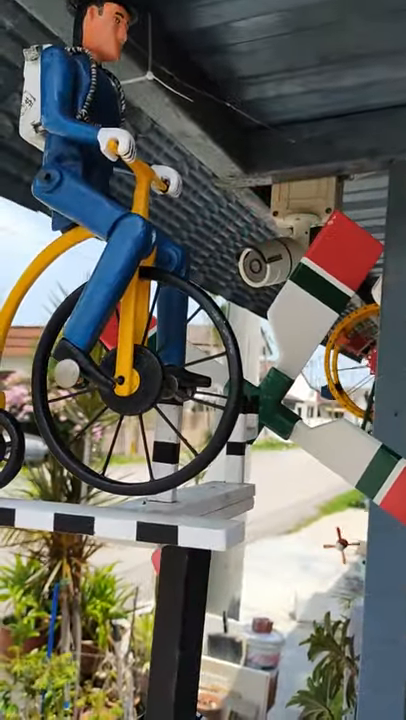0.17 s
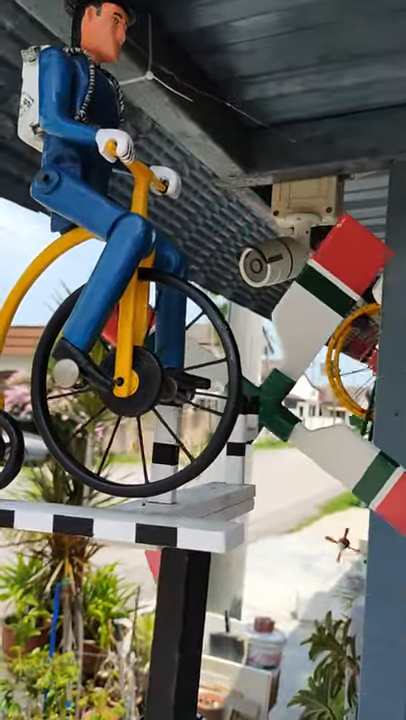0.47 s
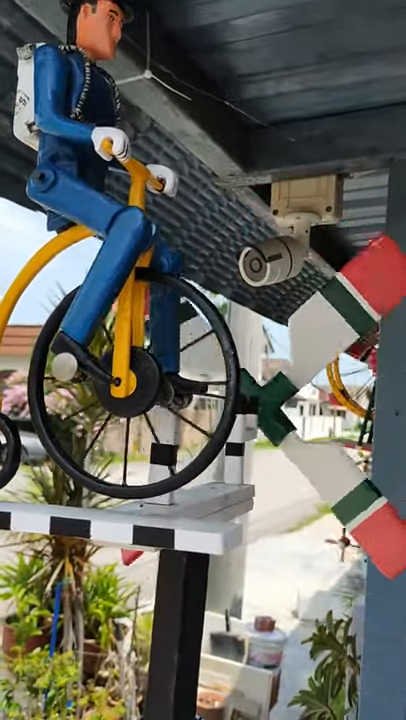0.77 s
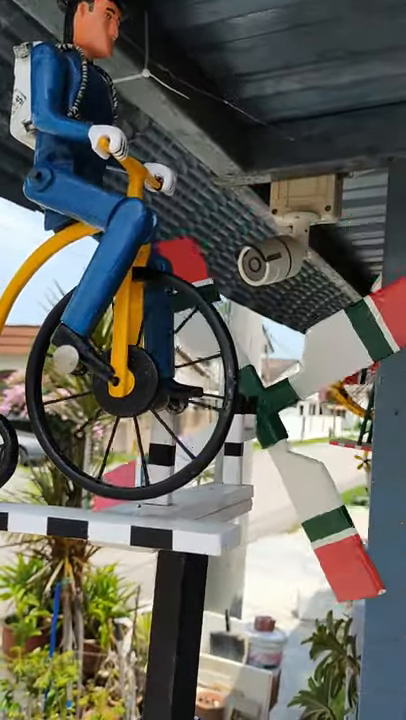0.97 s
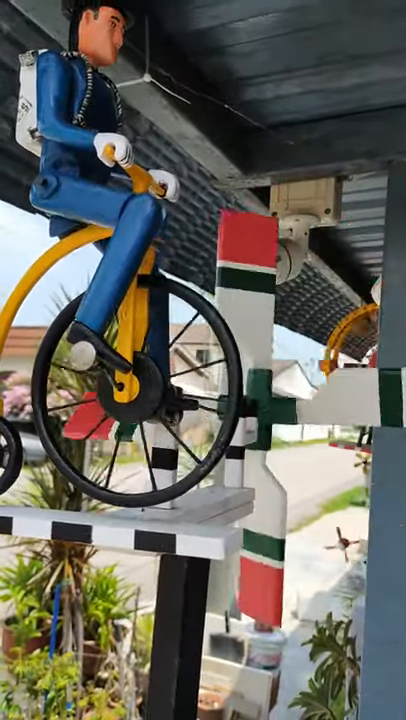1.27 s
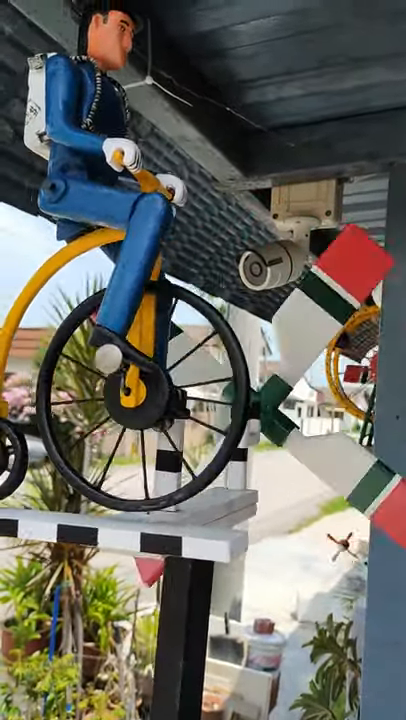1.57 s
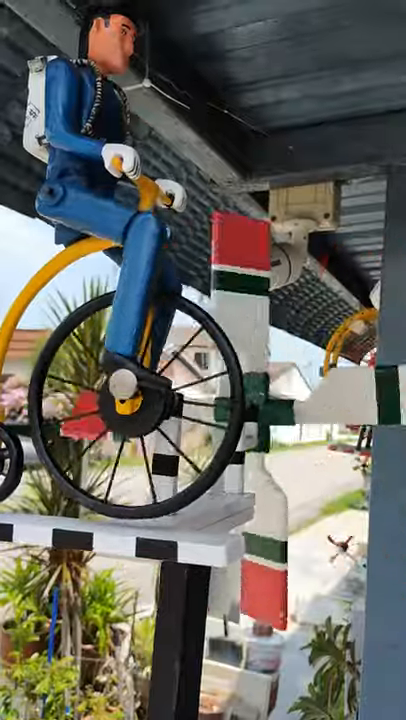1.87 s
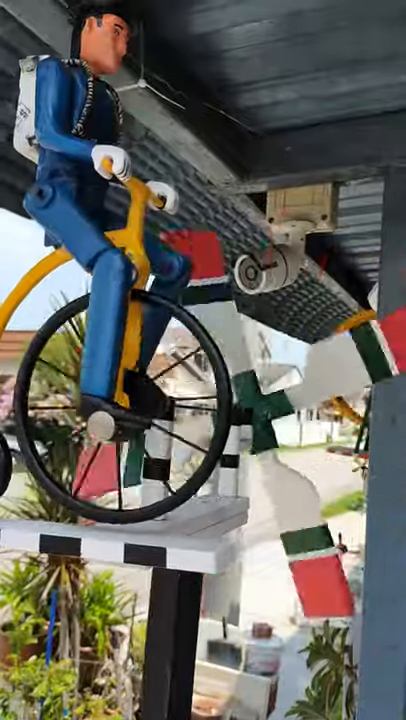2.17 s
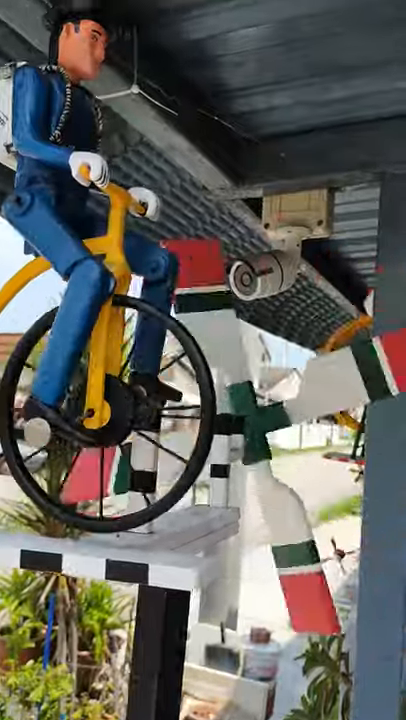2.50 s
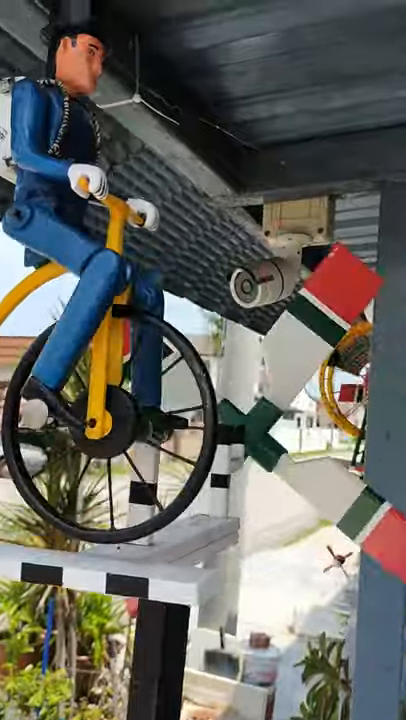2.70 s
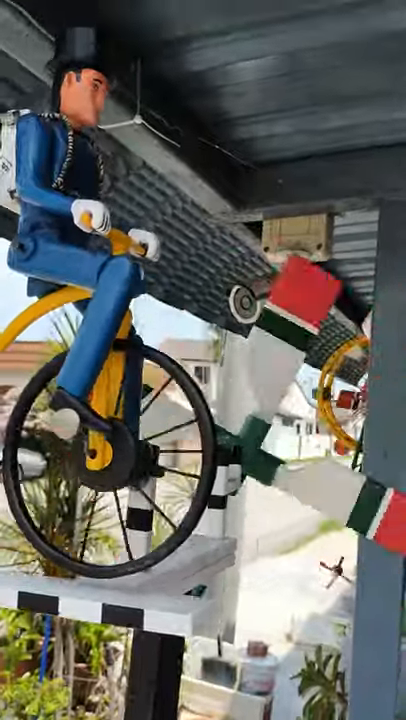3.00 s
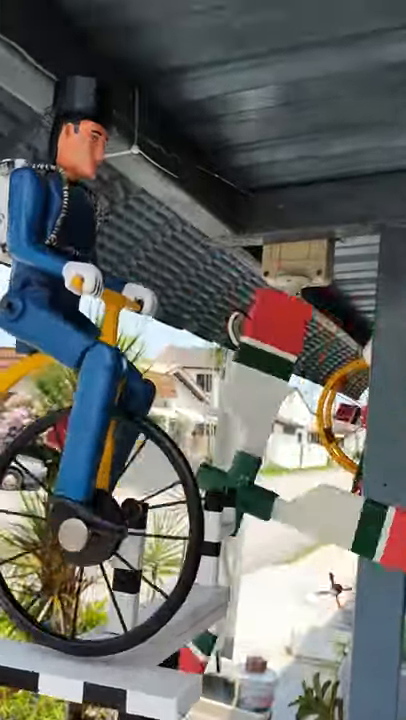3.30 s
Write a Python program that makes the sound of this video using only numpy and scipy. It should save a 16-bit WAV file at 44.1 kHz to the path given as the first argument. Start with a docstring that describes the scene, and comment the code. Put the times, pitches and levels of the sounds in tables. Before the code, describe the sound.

A loose wooden whirligig linkage clatters from start to end, two short chattering bursts per turn, at about 0.06, 0.4, 0.6, 0.9 and 1.1 s, then alternating gaps of 0.2 and 0.3 s until 3.36. Light ticks, grating and scuffs fill between; small knocks near 1.7 and 2.5-2.6. Soft outdoor hiss, short porch reflections. Low wind thumps the close microphone, strongest around 2.0-2.4, easing after 2.9.

```python
"""A soft outdoor hiss opens the scene, with wind buffeting and rumbling on the microphone.
Wooden whirligigs turn in the breeze under a porch roof: a loose linkage rattles twice in each turn,
out and back, with light ticks and grating between, stray scuffs and an odd knock.
Hiss and wind are shaped noise with pulses for eddies; every wooden contact is a brief puff of noise
with an envelope and colour of its own, and rattle and knocks also ring in the porch."""
import sys
import numpy as np
from scipy import signal
from scipy.fft import rfft, irfft
from scipy.io import wavfile
from scipy.ndimage import uniform_filter1d

SR = 44100
rng = np.random.default_rng(int(sys.argv[2]) if len(sys.argv) > 2 else 0)


def store_wav(level_fs):
    """Save 16-bit WAV to argv[1]."""
    pcm = np.round(np.clip(np.atleast_2d(level_fs), -1, 1) * 32767)
    wavfile.write(sys.argv[1], SR, pcm.T.astype(np.int16))


N = 152145
CONTACT_ATTACK_S = 0.0004   # time constant of every wooden onset


def from_db(db):
    """Decibels to gain."""
    return 10 ** (np.asarray(db) / 20)


def rms_one(x):
    """Scale to unit rms."""
    return x / np.sqrt(np.mean(x ** 2) + 1e-20)


def in_time(rows):
    """A control curve at every sample."""
    return np.interp(np.arange(N) / SR, *np.transpose(rows))


def add(out, s, sound):
    """Mix a sound in at a time in seconds."""
    i = max(int(s * SR), 0)
    out[i:i + len(sound)] += sound[:N - i]


def through(x, response):
    """Convolve with an impulse response."""
    return signal.fftconvolve(x, response)[:N]


def colour(x, points, size=8192):
    """Minimum-phase filter of unit energy that follows a spectrum, by folding its cepstrum."""
    hz, db = np.transpose(points)
    grid_hz = np.linspace(1, SR / 2, size // 2 + 1)
    gain = from_db(np.interp(np.log(grid_hz), np.log(hz), db))
    cepstrum = irfft(np.log(gain))
    cepstrum[1:size // 2] *= 2
    cepstrum[size // 2 + 1:] = 0
    response = irfft(np.exp(rfft(cepstrum)))
    return through(x, response / np.linalg.norm(response))


def band_noise(low_hz, high_hz):
    """Noise between two edges, rms 1, with a second of filter run-in dropped."""
    sos = signal.butter(3, [low_hz, high_hz], "band", fs=SR, output="sos")
    return rms_one(signal.sosfilt(sos, rng.standard_normal(N + SR))[SR:])


def evened(x, span_s):
    """Take the slow swings out of a noise."""
    return x / np.sqrt(uniform_filter1d(x ** 2, int(span_s * SR) + 1) + 1e-6)


def outdoors():
    """Steady distant hiss of coloured noise, with a very narrow band of noise as a faint thin whine."""
    # spectrum of the hiss: (frequency [Hz], level [dB])
    air = [(40, 8), (80, 12.5), (150, -10), (300, -1), (600, -3), (1100, -2), (1600, -0.5), (2200, 1.5),
           (3200, -6), (5500, -14.5), (8000, -8.5), (9400, -14.5), (12000, -12.5), (15000, -8), (16000, -9)]
    air_db, whine_db, whine_hz = -53.5, -75, 4005
    hiss = from_db(air_db) * colour(rng.standard_normal(N), air)
    whine = from_db(whine_db) * band_noise(whine_hz - 5, whine_hz + 5)
    return hiss + whine


def wind():
    """Turbulence on the microphone: stronger gusts reach higher in pitch, and single eddies slap."""
    # strength of the buffeting: (time [s], level [dB])
    gust = [(0.0, -49), (0.11, -64), (0.25, -39.5), (0.32, -59), (0.37, -43), (0.48, -37.5), (0.67, -49),
            (0.77, -32), (0.81, -43.5), (0.85, -30.5), (0.89, -42), (1.1, -31.5), (1.145, -64), (1.2, -39),
            (1.38, -36.5), (1.41, -24.5), (1.47, -34.5), (1.58, -36.5), (1.61, -26.5), (1.82, -43),
            (1.87, -29.5), (1.94, -47), (1.98, -27), (2.04, -15), (2.09, -18.5), (2.12, -41), (2.16, -20.5),
            (2.25, -37.5), (2.28, -26), (2.38, -32), (2.41, -25), (2.49, -46.5), (2.54, -34.5),
            (2.6, -27.5), (2.62, -51), (2.67, -31.5), (2.73, -59), (2.82, -32), (2.9, -45.5), (3.05, -52.5),
            (3.19, -41.5), (3.22, -56.5), (3.45, -69)]
    # strength of the deep rumble: (time [s], level [dB])
    rumble_curve = [(0.0, -44), (0.14, -49.5), (0.26, -31.5), (0.32, -50), (0.4, -32), (1.1, -33.5),
                    (1.15, -45), (1.2, -35.5), (1.45, -35.5), (1.63, -27.5), (1.83, -37), (2.09, -25),
                    (2.1, -29.5), (3.08, -42), (3.14, -31), (3.29, -48.5), (3.45, -44)]
    # spectrum of the rumble: (frequency [Hz], level [dB])
    rumble_colour = [(10, -44), (20, 3), (35, 8.5), (55, 4), (76, -2.5), (100, -16.5), (400, -100)]
    # buffeting by band: (centre [Hz], level in a reference gust [dB], growth [dB per dB of gust])
    wind_bands = [(76.6, -32, 0.81), (112.5, -34.5, 0.76), (157.3, -34.5, 1), (235, -38, 1.24),
                  (328.5, -45.5, 1.7), (441, -54, 2.01), (727, -63, 1.37), (1010, -79, 1.77)]
    # eddies that slap the microphone: (time [s], level [dB], half width [s])
    eddies = [(0.196, -30.5, 0.0014), (0.251, -23, 0.0029), (0.539, -23.5, 0.0011), (.843, -19.5, .0012),
              (.857, -15, .0012), (1.01, -23, 0.0014), (1.406, -21.5, 0.002), (1.621, -18, 0.0012),
              (1.665, -19, 0.00098), (1.873, -13, 0.0019), (2.022, -18.5, .0004), (2.088, -21.5, 0.0017),
              (2.158, -17.5, 0.00063), (2.275, -11.5, 0.0009), (2.291, -13.5, 0.00072),
              (2.318, -12, 0.00085), (2.406, -16, 0.00057), (2.453, -20, 0.0049), (2.541, -19, 0.0017),
              (2.67, -25, 0.001), (2.829, -21.5, 0.0011), (3.122, -24, 0.0021), (3.18, -24, 0.0024)]
    reference_gust_db, rumble_db = -28, -1
    gust_cap_db = 10.5   # above the reference gust
    flutter_db, flutter_hz = 3.5, 27.4

    # fast unsteadiness, an octave to each side of its centre
    flutter = flutter_db * evened(band_noise(flutter_hz / 2, flutter_hz * 2), 0.124)
    gust_db = np.minimum(in_time(gust) - reference_gust_db + flutter, gust_cap_db)
    out = np.zeros(N)
    edge = 2 ** (1 / 4)   # half-octave bands
    for hz, db, growth in wind_bands:
        buffet = evened(band_noise(hz / edge, hz * edge), 0.0418)
        out += from_db(db + growth * gust_db) * buffet
    for s, db, width_s in eddies:
        u = np.arange(-SR // 50, SR // 50) / SR / width_s
        slap = (1 - u ** 2) * np.exp(-u ** 2 / 2)   # a push between two pulls
        add(out, s - len(u) / 2 / SR, from_db(db) * slap)
    rumble = evened(colour(rng.standard_normal(N), rumble_colour), 0.146)
    return out + from_db(rumble_db + in_time(rumble_curve) + flutter / 2) * rumble


def dying_noise(t60):
    """A dense decay of unit energy."""
    t = np.arange(SR // 2) / SR
    tail = rng.standard_normal(len(t)) * np.exp(-np.log(1000) * t / t60)
    return tail / np.linalg.norm(tail)


def porch(x):
    """Close reflections from roof and posts, with a longer tail."""
    early_db, early_t60_s, tail_t60_s = -1.5, 0.037, 0.34
    response = from_db(early_db) * dying_noise(early_t60_s) + dying_noise(tail_t60_s)
    return through(x, response / np.linalg.norm(response))


def chatter(length_s):
    """A dying run of small contacts of uneven strength; unit energy."""
    contacts_per_s, spread_db = 820, 6
    t = np.arange(SR // 5) / SR
    sizes = from_db(spread_db * np.clip(rng.standard_normal(len(t)), -2, 1.6))
    hits = rng.random(len(t)) < contacts_per_s / SR
    clicks = sizes * hits * np.exp(-t / length_s)
    return clicks / np.linalg.norm(clicks)


def contacts(strengths):
    """Every contact gives a crisp puff of noise, with a strength of its own in each band."""
    t60_s, tint_db = 0.009, 3
    t = np.arange(SR // 20) / SR
    puff = (1 - np.exp(-t / CONTACT_ATTACK_S)) * np.exp(-np.log(1000) * t / t60_s)
    power = puff ** 2
    out = np.zeros(N)
    edges_hz = np.linspace(200, 17000, 11)
    for low, high in zip(edges_hz, edges_hz[1:]):
        tint = rms_one(from_db(tint_db * rng.uniform(-1.7, 1.8, N)))
        energy = np.abs(through((tint * strengths) ** 2, power / power.sum()))
        share = 2 * (high - low) / SR   # the band's part of the full spectrum
        out += np.sqrt(energy * share) * band_noise(low, high)
    return out


def frame(x):
    """The toy's mild resonances answer differently as the point of contact wanders."""
    # resonances in series: (frequency [Hz], width [Hz], lift before wandering [dB])
    frame_modes = [(2180, 176, 2.5), (5340, 78, 5), (6410, 220, 7), (8200, 180, 0), (12500, 400, 3.5),
                   (15200, 1400, 0.5)]
    spread_db = 3
    for hz, width_hz, db in frame_modes:
        wander = np.interp(np.arange(N), np.linspace(0, N, num=20), rng.standard_normal(20))
        lift = from_db(db + spread_db * np.clip(wander, -2, 1))
        resonance = signal.lfilter(*signal.iirpeak(hz, hz / width_hz, fs=SR), x)
        x = x + (lift - 1) * resonance
    return x


def strokes():
    """The linkage falls through its play: a rub swells into each chattering stroke; snap and body drives."""
    # strokes: (time [s], relative level [dB], chatter time constant [s], relative body level [dB])
    stroke_rows = [(0.061, -4, 0.017, -2.5), (0.406, -3, 0.013, -8), (.598, 0, 0.011, -3),
                   (0.899, -5, 0.021, -4.5), (1.091, -3.5, 0.01, -7.5), (1.366, -2.5, 0.016, -5),
                   (1.555, 1.5, 0.014, -4), (1.836, -1.5, 0.016, -3), (2.042, 0.5, 0.006, -5.5),
                   (2.327, -1, 0.015, -6.5), (2.533, -4, 0.0068, -6), (2.83, -2, 0.021, -5.5),
                   (3.047, -2.5, 0.011, -8.5), (3.359, -6, .028, -7.5)]
    snap_db, body_db = -4, -12
    slide_s, slide_db = 0.0068, -14.5   # growth time constant; level relative to snap_db
    sharp, dull = np.zeros((2, N))
    slide = np.exp(np.arange(-SR // 20, 0) / SR / slide_s)
    slide_drive = from_db(snap_db + slide_db) * slide / np.linalg.norm(slide)
    for s, db, length_s, ring_db in stroke_rows:
        burst = chatter(length_s)
        add(sharp, s, from_db(snap_db + db) * burst)
        add(sharp, s - len(slide) / SR, slide_drive)   # ends as the parts meet
        add(dull, s, from_db(body_db + ring_db) * burst)
    return sharp, dull


def stray_contacts():
    """Single ticks of the loose parts over the random fine contacts of the grating shaft."""
    # firm contacts, clustered at the strokes: (time [s], relative level [dB])
    ticks = [(0.1878, -33.5), (.4095, -30.5), (0.8978, -36), (0.901, -31), (1.083, -28.5), (1.093, -31),
             (1.229, -34.5), (1.357, -27), (1.3703, -34), (1.5255, -39), (1.555, -30.5), (2.0355, -33),
             (2.3361, -28), (2.5755, -31.5), (2.8366, -30), (2.8674, -33), (3.039, -38), (3.047, -27),
             (3.122, -38)]
    # how hard the shaft grates: (time [s], relative level [dB])
    rub = [(0, -1), (.26, 7.5), (.33, -9), (.37, -1), (.74, 0), (.82, -10), (1.0, -9), (1.26, 5),
           (1.67, -9), (1.73, 1.5), (2.4, 4), (2.48, -10), (2.62, 3), (3.2, 2.5), (3.45, -1)]
    rub_per_s, rub_db, rub_spread_db, tick_db = 300, -34, 4.5, 19.5
    spread = rub_spread_db * np.clip(rng.standard_normal(N), -2, 2)
    hits = rng.random(N) < rub_per_s / SR
    stray = hits * from_db(rub_db + in_time(rub) + spread)
    for s, db in ticks:
        add(stray, s, from_db([tick_db + db]))
    return stray


def linkage():
    """Strokes, ticks and grating give a bright snap and a smoothed dull answer, heard under the roof."""
    # bright snap of a contact: (frequency [Hz], level [dB])
    snap_colour = [(1000, -14), (4000, -18.5), (8000, -19), (9400, -27.5), (10600, -14.5), (11900, -11.5),
                   (13000, -9), (15100, -2.5), (16000, -2.5)]
    # dull answer of the frame: (frequency [Hz], level [dB])
    body_colour = [(400, -10), (900, -6), (1200, -6.5), (1600, 1.5), (2300, -2.5), (3200, -8),
                   (4700, -11.5), (6000, -13.5), (8000, -9), (9400, -16), (15000, -9)]
    body_build_s, stray_body_db = 0.0093, -12
    snap_room_db, body_room_db = -4.5, 1
    sharp, dull = strokes()
    stray = stray_contacts()
    # the body smooths the energy of the hits
    keep = np.exp(-1 / (body_build_s * SR))
    hit_energy = dull ** 2 + (from_db(stray_body_db) * stray) ** 2 + 1e-18
    dull = np.sqrt(signal.lfilter([1 - keep], [1, -keep], hit_energy))
    snap = colour(contacts(sharp + stray), snap_colour)
    body = colour(contacts(dull), body_colour)
    room = porch(from_db(snap_room_db) * snap + from_db(body_room_db) * body)
    return frame(snap + body + room)


def scuffs():
    """Faint stray scuffs of the wooden parts come at random in eight bands, as swelling noise."""
    low_hz, high_hz = 1500, 6800
    scuffs_per_s, decay_s = 7.1, 0.013   # rate in each band; time constant
    lowest_db, db_per_octave, spread_db = -53.5, -1, 3
    out = np.zeros(N)
    keep = np.exp(-1 / (decay_s * SR))
    edge = 2 ** (1 / 6)   # third-octave bands
    for hz in np.geomspace(low_hz, high_hz, num=8):
        sizes = from_db(spread_db * rng.uniform(-4, 1, N))
        starts = (rng.random(N) < scuffs_per_s / SR) * sizes
        decays = signal.lfilter([1], [1, -keep], starts + 1e-18)
        swell = uniform_filter1d(decays, size=200)   # softens the onsets
        level = from_db(lowest_db + db_per_octave * np.log2(hz / low_hz))
        out += level * swell * band_noise(hz / edge, hz * edge)
    return out


def knocks():
    """Wooden parts bump, scrape and squeak: decaying noise, each in a band of its own, plus the porch."""
    # (time [s], centre [Hz], width [Hz], level [dB], decay time constant [s])
    knock_rows = [(.752, 5260, 1200, -57.5, 0.012), (1.696, 2400, 696, -49, .016),
                  (1.72, 3060, 1330, -45, .012), (2.532, 5320, 300, -38, 0.0043),
                  (2.636, 4750, 1800, -45, 0.014)]
    room_db = -4
    out = np.zeros(N)
    t = np.arange(SR // 5) / SR
    for s, hz, width_hz, db, decay_s in knock_rows:
        noise = evened(band_noise(hz - width_hz / 2, hz + width_hz / 2), 0.037)
        grain = noise[SR:SR + len(t)]
        envelope = (1 - np.exp(-t / CONTACT_ATTACK_S)) * np.exp(-t / decay_s)
        add(out, s, from_db(db) * grain * envelope)
    return out + from_db(room_db) * porch(out)


def scene():
    """Everything at one microphone."""
    return (outdoors() + wind() + linkage() + scuffs() + knocks())[None]


def record(dry):
    """Peaks are rounded and the top is cut steeply."""
    overload, cutoff_hz = 0.33, 15750   # overload: ceiling of the rounding, full scale = 1
    low_pass = signal.firwin(601, cutoff_hz, window=("kaiser", 8), fs=SR)
    rounded = overload * np.tanh(dry / overload)
    return signal.fftconvolve(rounded, low_pass[None], mode="same")


dry = scene()
out = record(dry)
store_wav(out)
```